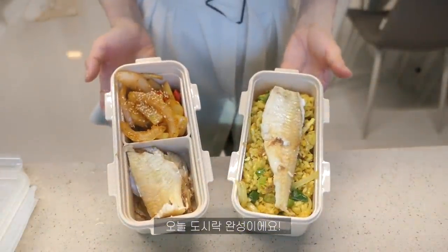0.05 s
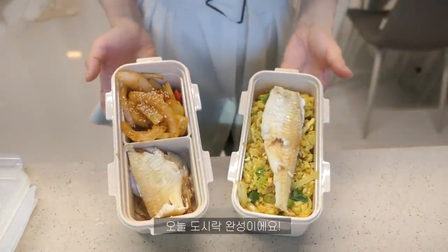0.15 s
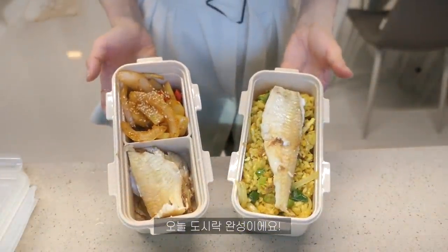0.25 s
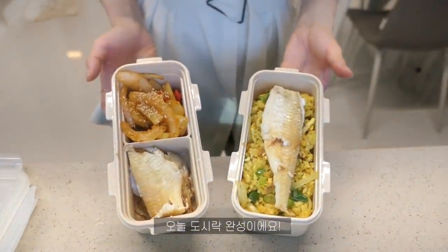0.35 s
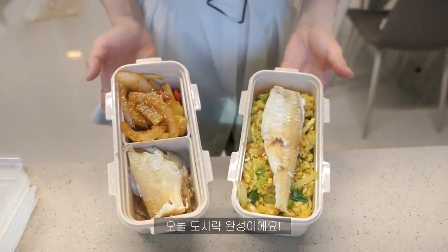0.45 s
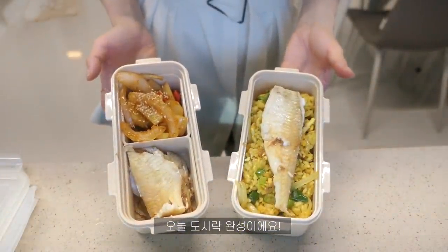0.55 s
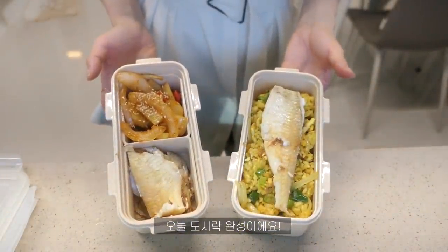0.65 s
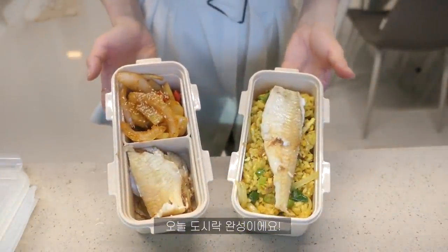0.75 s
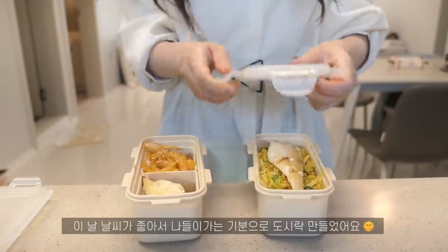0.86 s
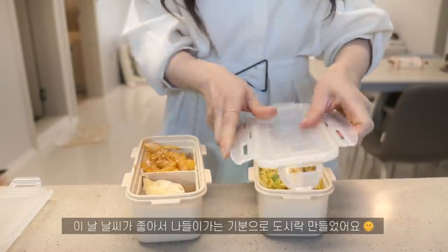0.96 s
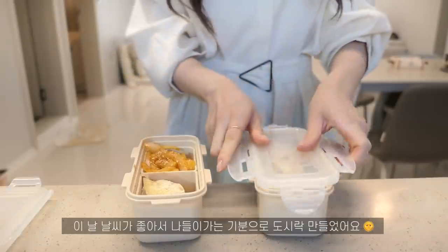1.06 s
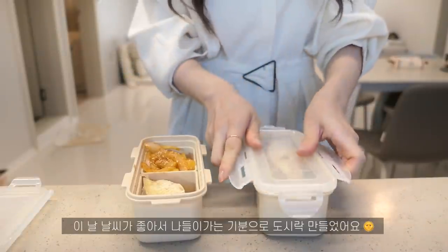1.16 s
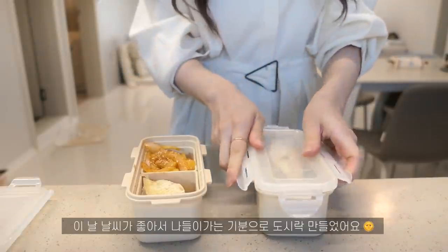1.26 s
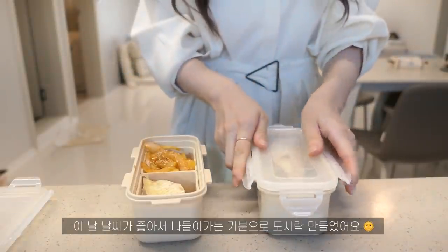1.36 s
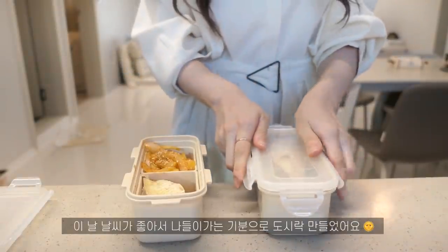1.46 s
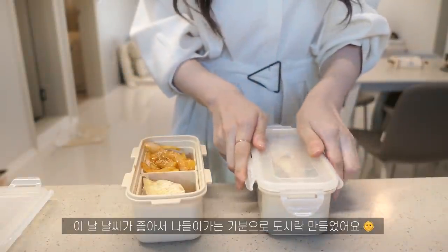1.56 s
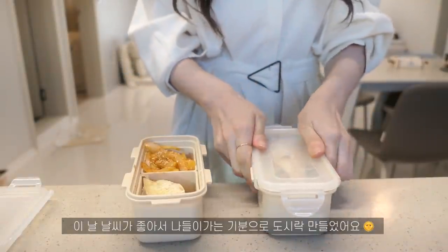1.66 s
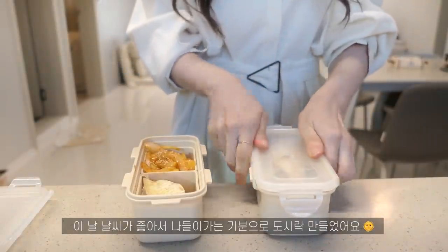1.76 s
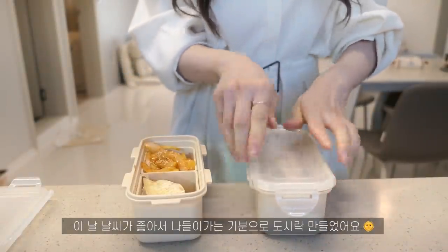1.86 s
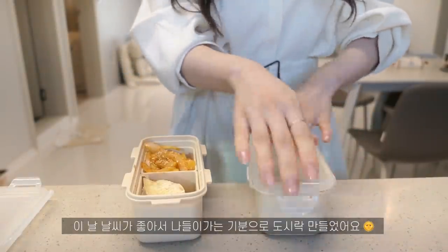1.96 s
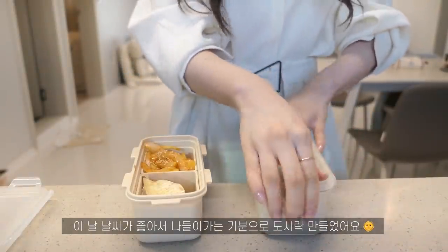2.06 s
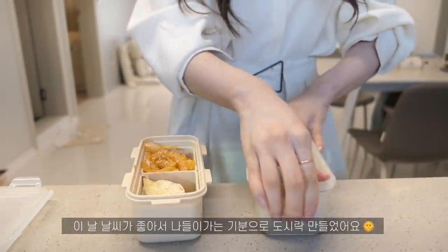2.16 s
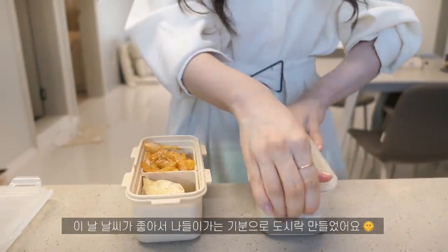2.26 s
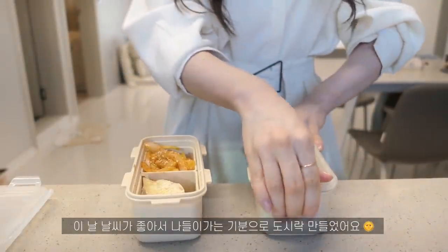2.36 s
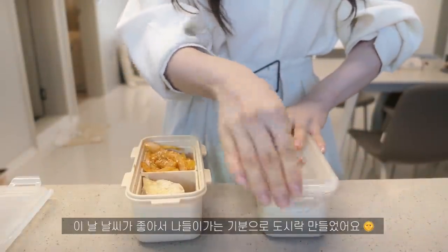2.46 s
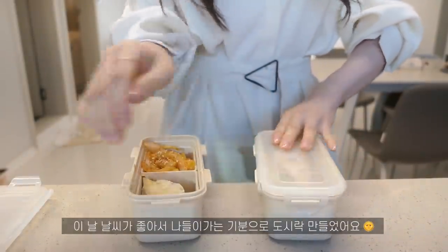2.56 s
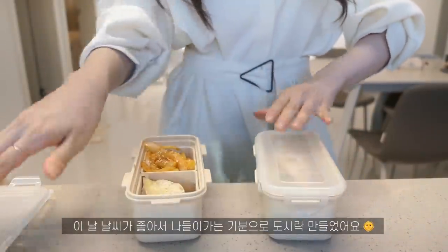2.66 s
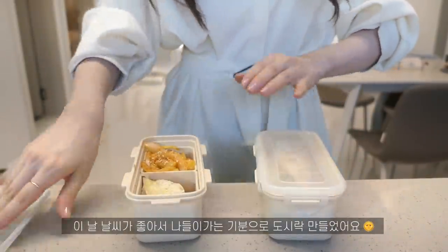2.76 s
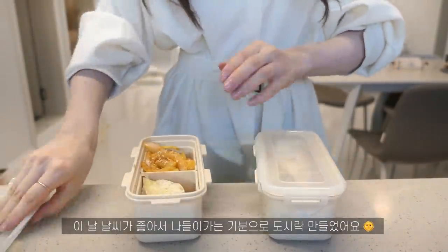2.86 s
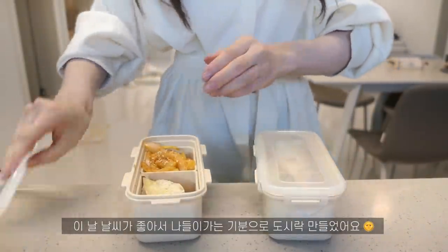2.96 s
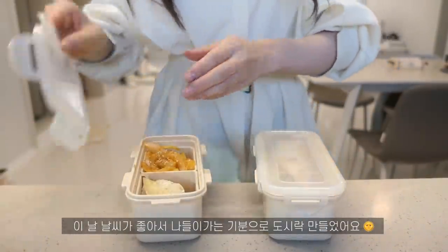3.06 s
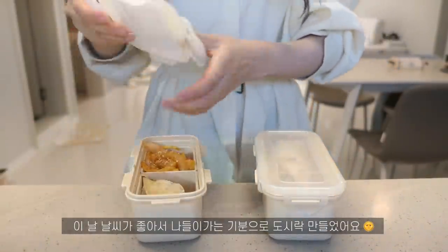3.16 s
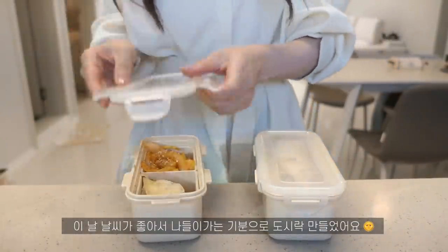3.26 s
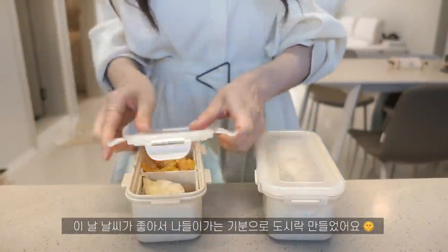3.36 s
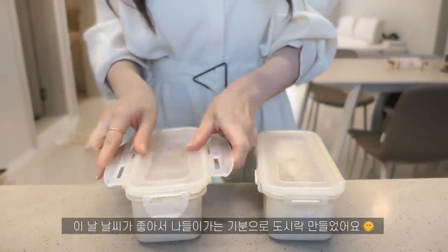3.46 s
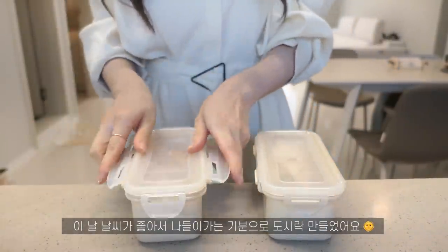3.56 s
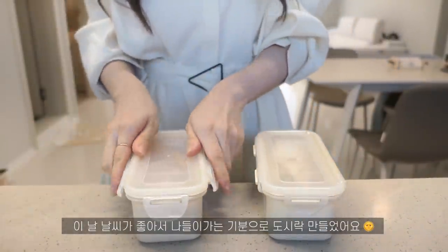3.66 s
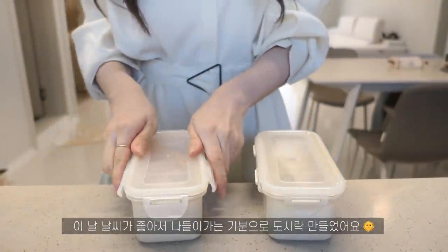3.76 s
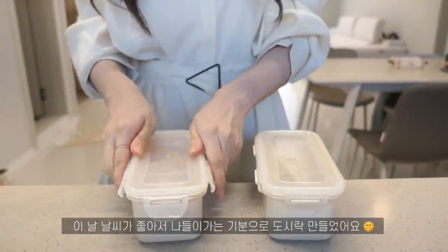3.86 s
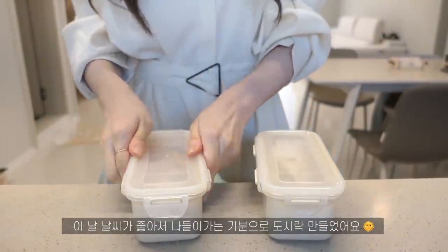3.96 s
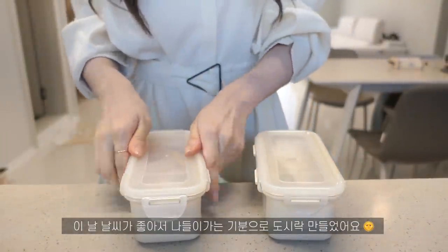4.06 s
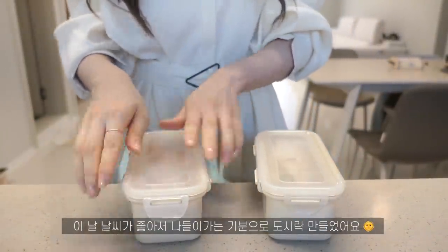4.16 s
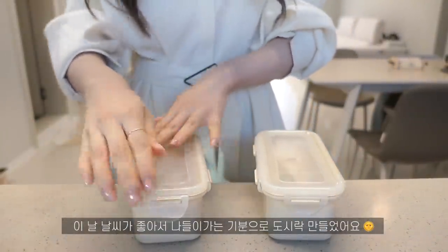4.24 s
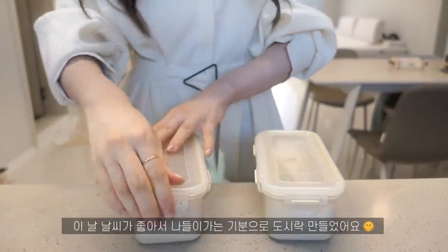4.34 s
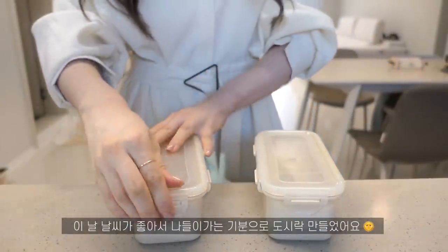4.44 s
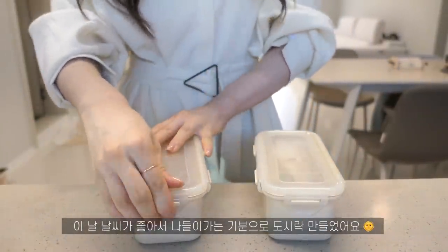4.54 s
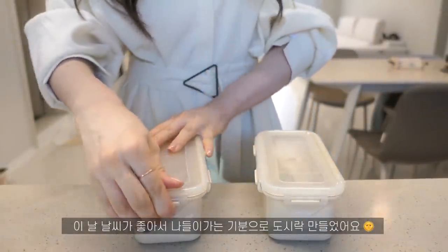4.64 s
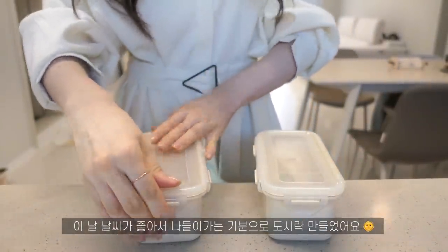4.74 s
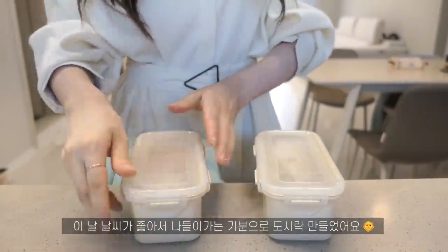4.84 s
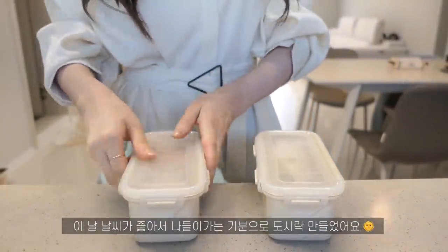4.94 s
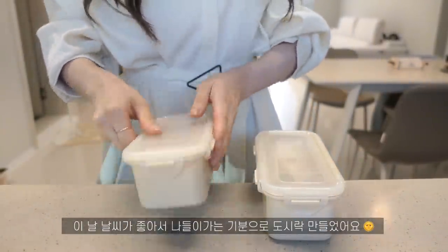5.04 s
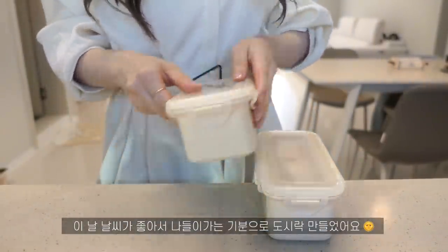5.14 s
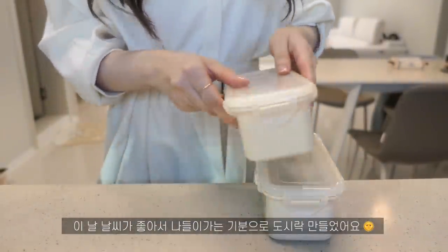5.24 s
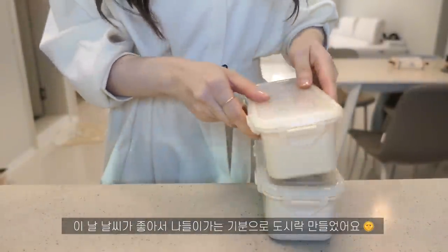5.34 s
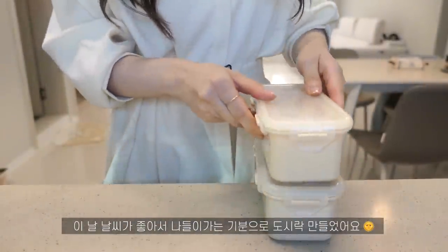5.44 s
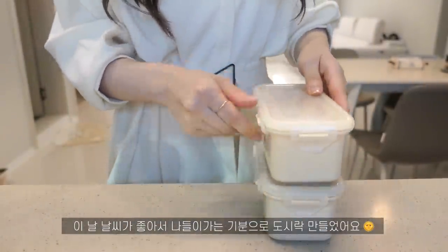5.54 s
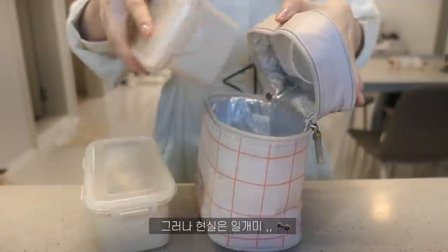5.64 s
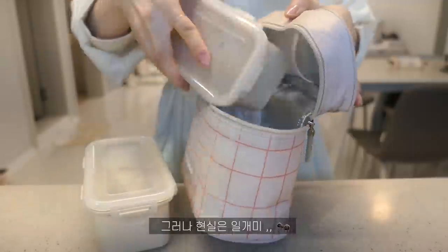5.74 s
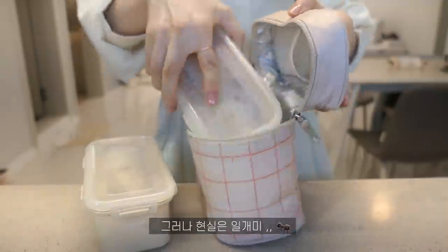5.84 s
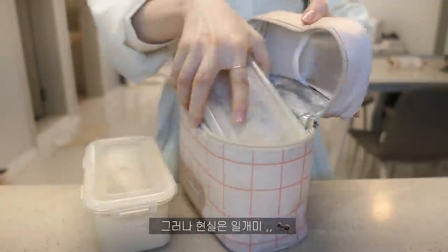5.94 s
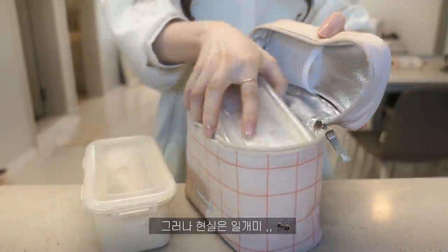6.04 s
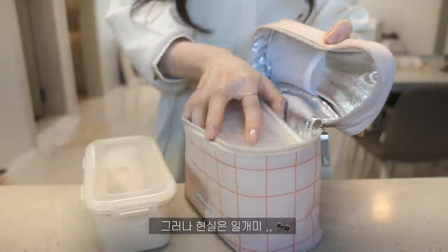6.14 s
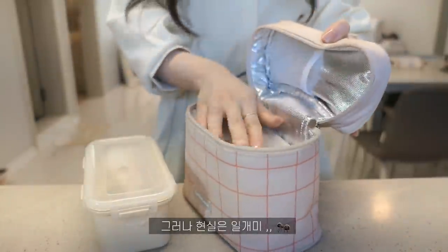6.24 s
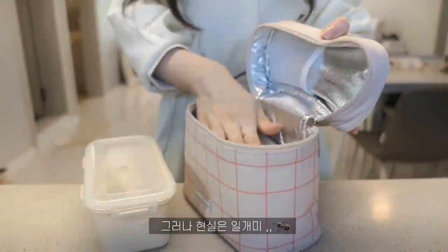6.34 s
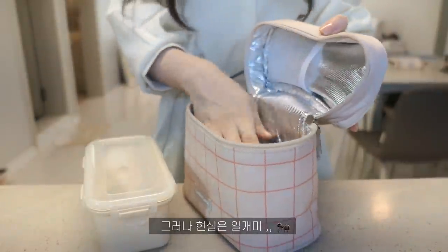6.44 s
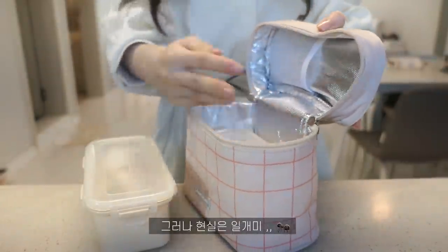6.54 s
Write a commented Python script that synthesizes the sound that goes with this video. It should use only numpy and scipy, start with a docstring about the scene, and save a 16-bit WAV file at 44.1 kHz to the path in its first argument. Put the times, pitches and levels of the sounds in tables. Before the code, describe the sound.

Faint, soft kitchen air opens alone, its tone shifting slightly at 0.8 s. From 1.1 to 1.4 s a light plastic lid clatters onto a full box in hollow, mid-pitched knocks with finger rubs. At 1.67 s a latch cracks shut, very loud and close, its bright echo swelling in the room; softer handling follows, then another sharp snap at 2.27 s with a small follow-up click. Around 2.9-3.0 s come light ticks, a rub and a tiny rising rubber squeak. The second lid knocks down at 3.4-3.75 s with a short hollow hum gliding downward, then snaps hard at 3.96 s and with a crisp double click at 4.54-4.6 s. Boxes shift at 4.97 s and stack with low thumps at 5.4-5.5 s. At 5.67 s the echo breaks off; until 6.6 s a box pushes into a soft foil-lined bag with rubs, crackling rustle and dull bumps.

```python
"""Two plastic lunch boxes on a stone counter in a quiet kitchen, whose air noise changes colour early on.
The first lid is laid on with knocks and snapped shut by its latches; a gasket squeaks. Air hums under the
second lid until it too is snapped shut. The boxes settle and are stacked, contact ringing and echo break off,
and one box is pushed into a foil-lined bag with rubs, rustles and bumps. Contacts are struck box modes plus
clicks and hiss; a limiter ducks on the loudest peaks and lets the room's echo swell back as it recovers."""
import sys
import numpy as np
from scipy import signal
from scipy.fft import rfft, irfft, next_fast_len
from scipy.io import wavfile
from scipy.ndimage import uniform_filter1d, minimum_filter1d, map_coordinates

SR = 44100
rng = np.random.default_rng(int(sys.argv[2]) if len(sys.argv) > 2 else 0)


def put_to_file(sound):
    """Save the sound as 16-bit audio at rate SR, in the file named by the first command-line argument."""
    columns = np.atleast_2d(sound).T  # one column per channel
    safe = np.clip(columns, -1, 1)
    whole_steps = np.round(safe * 32767)
    wavfile.write(sys.argv[1], SR, whole_steps.astype(np.int16))


N = 291060
CUT_S = 5.668  # contact ringing and echo break off here


def amp(db):
    """Decibels to amplitude."""
    return 10 ** (np.asarray(db) / 20)


def unit(x):
    """Scale to an RMS of 1."""
    return x / np.sqrt(np.mean(x ** 2) + 1e-20)


def along(points, hz):
    """Interpolate (f/Hz, value) points on a log-frequency axis."""
    f, v = np.transpose(points)
    return np.interp(np.log(hz + 1), np.log(f + 1), v)


def curves(rows, outside=None):
    """One value per sample for each column after the time."""
    s, *cols = np.transpose(rows)
    return np.array([np.interp(np.arange(N) / SR, s, c, outside, outside) for c in cols])


def wobble(rate_hz):
    """Smooth random curve through rate_hz knots a second."""
    knots = rng.standard_normal(int(N * rate_hz / SR) + 4)
    return map_coordinates(knots, [np.arange(N) * rate_hz / SR])


def filtered(x, response):
    """Multiply the spectrum of x by a response of frequency in Hz."""
    n = x.shape[-1]
    m = next_fast_len(n + 8192)
    return irfft(rfft(x, m) * response(np.fft.rfftfreq(m, 1 / SR)), m)[..., :n]


def paired(noises, alike, spectrum):
    """Two unrelated noises mixed into left and right of the given likeness and colour."""
    def mid_side(hz):
        angle = np.arccos(np.clip(along(alike, hz), -1, 1)) / 2
        return amp(along(spectrum, hz)) * [np.cos(angle), np.sin(angle)]

    mid, side = filtered(noises, mid_side)
    return unit(np.array([mid + side, mid - side]))


def grains(rate_hz, spread_db):
    """Tiny slips at random moments, few of them strong."""
    strength = amp(spread_db * np.minimum(rng.exponential(size=N), 3))
    return (rng.random(N) < rate_hz / SR) * rng.standard_normal(N) * strength


def patchy(x, depth_db):
    """Random patches of gain over time and frequency, alike in both rows."""
    z = signal.stft(x, nperseg=256)[2]
    field = rng.standard_normal(z.shape[1:])
    field = uniform_filter1d(uniform_filter1d(field, size=14, axis=0), size=9, axis=1)
    return signal.istft(z * amp(depth_db * unit(field)), nperseg=256)[1][:, :N]


# air colour at the first and second viewpoint: f/Hz, relative density/dB
AIR_FIRST = [(15, -50), (30, -15), (175, -8), (236, 0.5), (263, -9.5), (301, -8.5), (531, -8), (641, -12.5),
             (1100, -14), (1400, -15.5), (1520, -22), (4740, -37), (6380, -31), (14800, -35.5),
             (16000, -36)]
AIR_LATER = [(15, -36.5), (30, -7), (70, -15), (108, -5), (309, -2.5), (344, -4.5), (503, -7), (591, -2),
             (775, -10.5), (863, -9), (1440, -15), (2050, -20.5), (16000, -35.5)]
# air: f/Hz, left-right likeness (-1 to 1)
AIR_ALIKE = [(60, -0.97), (180, -0.63), (550, -0.59), (1650, -0.32), (4970, 0.61), (15000, 0.047)]
MOVE_S, FIRST_DB, LATER_DB = 0.824, -45, -43.5  # the viewpoint changes at MOVE_S


def hush():
    """Steady kitchen air: coloured noise, from one viewpoint and then another."""
    first = paired(rng.standard_normal((2, N)), AIR_ALIKE, AIR_FIRST)
    later = paired(rng.standard_normal((2, N)), AIR_ALIKE, AIR_LATER)
    air = np.where(np.arange(N) < MOVE_S * SR, amp(FIRST_DB) * first, amp(LATER_DB) * later)
    return amp(0.84 * wobble(21)) * air


# echo: f/Hz, t60/s, relative level/dB
ECHO = [(101, 0.51, 13), (308, 0.39, 5), (700, 0.67, 2.5), (1400, 0.71, 0), (2260, 0.74, 0),
        (3530, 0.61, 8), (5470, 0.6, 6), (7000, 0.62, 3.5), (9500, 0.54, 1.5), (12500, 0.44, 2),
        (15000, 0.36, 8)]
# echo: f/Hz, left-right likeness (-1 to 1)
ECHO_LIKENESS = [(60, 0.91), (180, 0.75), (550, 0.81), (1650, 0.75), (4970, 0.83), (15000, 0.49)]


def kitchen(x):
    """Each frequency of the echo dies at its own speed; a fresh random tail serves each third of a second."""
    out, step, rows = np.zeros((2, N + 3 * SR)), SR // 3, np.array(ECHO)
    for at in range(0, N, step):
        hz, t, z = signal.stft(rng.standard_normal((2, SR)), SR, nperseg=256)
        decay = amp(-60 * t / along(rows[:, :2], hz)[:, None])
        onset = np.clip(t / 0.0027, 0, 1)
        tail = signal.istft(z * decay * onset, SR, nperseg=256)[1]
        tail = paired(tail, ECHO_LIKENESS, rows[:, ::2]) / np.sqrt(tail.shape[1])
        wet = signal.fftconvolve(x[None, at:at + step], tail, axes=1)
        out[:, at:at + wet.shape[1]] += wet
    return out[:, :N]


# box pushed into the bag: t/s, press level/dB, rustle level/dB, low bump level/dB
BAG_PUSH = [(5.745, -61, -51, -62), (5.777, -39, -36.5, -68), (5.835, -45, -45, -40),
            (5.855, -46, -56, -44), (5.867, -33, -35, -27), (5.899, -38, -34, -38),
            (6.029, -36, -36.5, -59), (6.075, -34, -34.5, -63), (6.127, -34.5, -42.5, -42),
            (6.161, -34.5, -41.5, -57), (6.213, -35, -42.5, -47), (6.237, -26, -25, -40),
            (6.267, -18.5, -35, -34), (6.299, -36.5, -56, -47), (6.327, -28, -35, -52),
            (6.351, -20.5, -26, -45), (6.377, -35, -37.5, -21), (6.392, -40, -41, -28),
            (6.407, -38, -39, -33), (6.461, -34, -37, -56), (6.6, -67, -38.5, -70)]
BAG_RUB_DB = -0.5  # over the mean of press and rustle


def sag():
    """The soft bag gives under the box: lumpy noise through a 95 Hz resonance."""
    lumps = amp(8.1 * wobble(22)) * rng.standard_normal(N)
    bumps = filtered(lumps, lambda f: 1j * f * 60 / (95 ** 2 - f * f + 1j * f * 60))
    return amp(curves(BAG_PUSH, -120)[2]) * unit(bumps)


# hand movements: t/s, hold/s, press level/dB, rub level/dB, rustle level/dB
HAND_MOVES = [(0.847, 0.13, -52, -54.5, -53), (1.109, 0.11, -65, -35.5, -52), (1.306, 0.074, -42, -50, -51),
              (1.465, 0.18, -44.5, -45, -56), (2, 0.14, -48, -40.5, -60.5), (2.908, 0.1, -50, -45, -58),
              (3, 0.011, -40, -26.5, -33), (3.166, 0.5, -55.5, -50.5, -57), (3.438, 0.21, -40.5, -54, -58),
              (3.686, 0.029, -67, -33, -46), (3.77, 0.18, -45.5, -56, -58), (4.318, 0.096, -49, -48, -49),
              (4.978, 0.023, -42, -34, -48.5), (5.427, 0.096, -49, -40.5, -72),
              (5.761, 0.017, -48, -38.5, -46), (5.81, 0.017, -48, -40.5, -48)]
REACH_DB_PER_S, LET_GO_DB_PER_S = 601, 169


def effort():
    """Press, rub and rustle levels in dB: each movement swells, holds and dies away."""
    t = np.arange(N) / SR
    moves = []
    for s, hold_s, *levels_db in HAND_MOVES:
        swell_db = REACH_DB_PER_S * np.maximum(s - t, 0)
        die_db = LET_GO_DB_PER_S * np.maximum(t - s - hold_s, 0)
        moves.append(np.array(levels_db)[:, None] - swell_db - die_db)
    press_db, rustle_db, _ = curves(BAG_PUSH, -120)
    bag_rub_db = (press_db + rustle_db) / 2 + BAG_RUB_DB
    return np.max(moves + [np.array([press_db, bag_rub_db, rustle_db])], axis=0)


# box modes, before damping and scatter: f/Hz, level/dB, t60/s
BOX_MODES = [(114.8, 3.5, 0.11), (219, -1.5, 0.089), (241, 11, 0.11), (305, 0, 0.22), (319, 1.5, 0.074),
             (399.9, 17, 0.012), (553, -5, 0.1), (680, -10.5, 0.2), (757.7, 0, 0.13), (986.4, 5, 0.094),
             (1100, 1, 0.069), (1264, -1, 0.16), (1620, -1.5, 0.0017), (1537, 5, 0.044), (1903, -18, 0.017),
             (2175, 10.5, 0.028), (2200, 23, 0.044), (4300, 15, 0.02), (5030, 5, 0.045),
             (6560, 10.5, 0.025), (7300, -10.5, 0.0037)]
# thud, body, edge and crack bands: low f/Hz, high f/Hz
PART_BANDS = [(95, 400), (400, 1600), (1600, 2700), (3700, 12000)]
# sleeve and foil rustle: f/Hz, relative density/dB
RUSTLE_COLOUR = [(880, -27), (1500, -27), (1960, -6), (3450, -13), (7390, -13), (12700, -22.5),
                 (15000, -21.5), (16000, -42)]


def gripped(modes, grip, f):
    """Response at f of resonances broadened by the hand's grip."""
    total = 0
    for k, (hz, db, t60_s) in enumerate(modes):
        loss = 1j * f * grip / t60_s
        total = total + (-1) ** k * amp(db) * loss / (hz * hz - f * f + loss)
    return total


def hands():
    """Fingers press and slide: slips drive the box modes, damped by the grip; sleeves and foil crackle."""
    press_db, rub_db, rustle_db = effort()
    low, middle = ([m for m in BOX_MODES if lo < m[0] < hi] for lo, hi in PART_BANDS[:2])
    pressing = amp(2.5 * wobble(30)) * rng.standard_normal(N)
    press = unit(filtered(pressing, lambda f: gripped(low, 6.5, f) / (1 + (f / 450) ** 4)))
    slips = amp(2.2 * wobble(40)) * grains(3500, spread_db=2)
    rub = unit(filtered(slips, lambda f: gripped(middle, 11, f) / (1 + (f / 1700) ** 2)))
    clumps = amp(2.2 * wobble(25) + 1.5 * wobble(90))  # creases give way in bursts
    crackle = np.array([unit(grains(3000, spread_db=4)) + 1.2 * rng.standard_normal(N) for _ in range(2)])
    rustle = paired(patchy(clumps * crackle, depth_db=3.5), [(2000, 0.73), (12000, 0.83)], RUSTLE_COLOUR)
    return amp(press_db) * press + amp(rub_db) * rub + amp(rustle_db) * rustle


# boxes settling on the counter or each other: t/s, level/dB before the envelope, f/Hz
LANDINGS = [(2.868, -45, 110), (4.96, -40, 150), (5.43, -24.5, 170), (5.51, -32, 149)]
SETTLE_RISE_S, SETTLE_T60_S = .008, 0.31


def settle():
    """A full box lands with a low, uneven thump that lingers: decaying resonant noise."""
    out = np.zeros(N)
    for s, db, hz in LANDINGS:
        def thump(f):
            resonance = 1j * f * hz / (hz * hz - f * f + 1j * f * hz * 0.5)
            return resonance / (1 + (f / hz / 2) ** 4)

        t = np.maximum(np.arange(N) / SR - s, 0)
        low = unit(filtered(rng.standard_normal(N), thump))
        out += amp(db - 60 * t / SETTLE_T60_S) * (1 - np.exp(-t / SETTLE_RISE_S)) * low
    return out


# air under the loose second lid: t/s, level/dB before a 4 dB cut, f/Hz
LID_AIR = [(3.536, -47, 760), (3.546, -24, 763), (3.57, -35, 753.4), (3.6, -34, 748.5), (3.644, -49, 721.2),
           (3.706, -11, 670), (3.782, -41.5, 642.5), (3.81, -19, 660), (3.836, -45, 693), (3.934, -30, 621),
           (3.95, -62, 648)]


def hollow():
    """Trapped air hums unevenly, gliding in pitch, while the lid is worked into place."""
    level_db, pitch_hz = curves(LID_AIR)
    n = np.arange(N)
    inside = (n > LID_AIR[0][0] * SR) & (n < LID_AIR[-1][0] * SR)
    phase = 2 * np.pi * np.cumsum(pitch_hz) / SR
    hum = wobble(170) * np.cos(phase) + wobble(170) * np.sin(phase)
    return inside * amp(level_db - 4) * unit(hum)


SQUEAK_S, SQUEAK_LENGTH_S = 2.979, 0.014
SQUEAK_HZ, SQUEAK_RISE_HZ, SQUEAK_DB = 1230, 246, -13


def squeak():
    """The rubber gasket slips once: a slightly rising chirp with two weak harmonics."""
    u = np.clip((np.arange(N) / SR - SQUEAK_S) / SQUEAK_LENGTH_S, 0, 1)
    phase = 2 * np.pi * np.cumsum(SQUEAK_HZ + SQUEAK_RISE_HZ * u) / SR
    tone = np.sin(phase) + amp(-24) * np.sin(2 * phase) + amp(-28) * np.sin(3 * phase)
    return amp(SQUEAK_DB + 1.5 * wobble(560)) * np.sin(np.pi * u ** 1.24) * tone


# thud hiss band: low f/Hz, high f/Hz
THUD_HISS_BAND = (215, 430)
# left-right differing share of hiss: thud, body, edge, crack (ratio)
HISS_WIDTH = [.05, .1, .15, .35]


def contacts(table, rise_s, blow_t60_s, damping, hiss, hiss_t60_s, click, count, span, focus_db, carry):
    """Each contact shakes the box modes at new strengths, clicks and hisses in each part.

    Returns the near sound and what fills the room: there only the first count parts keep their ring,
    the others mostly even out over all directions and carry a share of it.
    """
    near, far, t = np.zeros((2, N + SR)), np.zeros(N + SR), np.arange(SR // 8) / SR
    hz, level_db, t60_s = np.transpose(BOX_MODES)[..., None]
    part = np.searchsorted([lo for lo, hi in PART_BANDS], hz[:, 0]) - 1
    spike = 1. * (np.arange(len(t)) == round(rise_s * SR))

    def bandpass(edges_hz):
        return signal.butter(2, edges_hz, "band", fs=SR, output="sos")

    def fade(fade_t60_s):
        return (1 - np.exp(-t / rise_s)) * amp(-60 * t / fade_t60_s)

    bands = [bandpass(edges) for edges in PART_BANDS]
    for s, db, thud_db, edge_db, crack_db, pan_db, pitch_hz in table:
        # the struck spot favours body modes near its pitch
        spot_db = -focus_db * np.log2(hz / pitch_hz) ** 2 * (part == 1)[:, None]
        noisy = [bandpass(THUD_HISS_BAND), bandpass((pitch_hz / span, pitch_hz * span))] + bands[2:]
        # signs join neighbours smoothly
        clicks = [(-1) ** k * unit(signal.sosfilt(band, spike)) for k, band in enumerate(noisy)]
        luck = rng.standard_normal((len(BOX_MODES), 2, 1))
        decay = amp(level_db + spot_db + 2 * luck[:, 0] - 60 * t * damping / t60_s)
        rings = decay * np.sin(2 * np.pi * hz * (1 + .06 * luck[:, 1]) * t)
        blow = ((0.5 + rng.standard_normal(len(t))) * fade(blow_t60_s))[:SR // 50]
        hit, even = np.zeros((2, len(t))), np.zeros(len(t))
        for k, gain_db in enumerate([thud_db, 0, edge_db, crack_db]):
            struck = signal.fftconvolve(rings[part == k].sum(0), blow)[:len(t)]
            ring = signal.sosfilt(bands[k], struck)
            noise, apart = signal.sosfilt(noisy[k], rng.standard_normal((2, len(t))) * fade(hiss_t60_s[k]))
            sound = unit(ring) + hiss[k] * unit(noise) + click[k] * clicks[k]
            size = amp(gain_db) / np.abs(sound).max()
            sound = size * sound
            hit += sound + size * HISS_WIDTH[k] * hiss[k] * unit(apart) * [[1], [-1]]
            even += sound if k < count else clicks[k] * np.std(sound) + carry * sound
        at = round(s * SR)
        length = len(t) if s > CUT_S else min(len(t), round(CUT_S * SR) - at)
        near[:, at:at + length] += amp(db + np.array([[pan_db], [-pan_db]]) / 2) * hit[:, :length]
        far[at:at + length] += amp(db) * even[:length]
    return near[:, :N], far[:N]


# lid and box knocks: t/s, body level/dB, thud, edge and crack level over body/dB, body f/Hz
KNOCK_HITS = [(0.833, -42.5, 9.5, -12, -17, 489), (1.106, 3, -26, -11.5, -24, 1015),
              (1.139, -4, -13.5, -10.5, -18, 815), (1.149, -5.5, -10.5, -16, -20, 930),
              (1.155, -3, -24, -7.5, -22, 1030), (1.167, -19, -9, -26, -35, 1100),
              (1.184, -9, -22, -27, -28, 1160), (1.193, -15.5, -28, -26, -35, 940),
              (1.206, -18, -10, -2, -5.5, 786), (1.274, -9, -25, -6, -7, 1260),
              (1.332, -9, -16, -30, -45, 720), (1.358, -10, -3.5, -17, -14, 980),
              (1.368, -1.5, -15, -27, -29, 795), (1.372, -1.5, -28, -11.5, -9.5, 1100),
              (1.382, -2.5, -3.5, -32, -18, 680), (1.387, -8, -9.5, -28, -35, 544),
              (1.404, -30.5, 4, -35, -46, 497), (1.53, -20.5, -31, -5, -8, 630),
              (2.04, -40.5, 17, -15, -17, 727), (2.868, -35, 0, -10, -5, 982),
              (2.905, -35, -4.5, 1, 3.5, 799), (3.005, -12.5, -11.5, -0.5, -1, 1100),
              (3.015, -20.5, -8, -6, -15, 900), (3.018, -14, -8.5, 2.5, 5, 1200),
              (3.222, -42, 15.5, -17, -18, 503), (3.389, -27.5, -32, -7, -5, 1060),
              (3.439, -3, -40, -11, -14.5, 960), (3.486, -23.5, -11, -5.5, -7, 746),
              (3.5357, 4, -31, -12, -22, 785), (3.545, -13, -5.5, 0, -3, 900),
              (3.59, -11.5, -14.5, -46, -60, 727), (3.66, -13.5, -24, -3, -12, 650),
              (3.684, -10, -15, -38, -50, 680), (3.691, -2.5, -10, -22, -28, 1100),
              (3.694, -20, -16, -33, -43, 950), (3.699, -5, -22, -35, -43, 880),
              (3.705, -2.5, -4, -12, -12.5, 570), (3.719, -27, 0, -27, -36, 680),
              (3.738, -14.5, 1, -32, -42, 570), (3.759, -24, -6, -19, -30, 680),
              (4.313, -32.5, 5.5, -21, -36.5, 1030), (4.385, -10.5, -18.5, -9, -5, 790),
              (4.949, -32.5, 0, -15, -20, 519), (4.976, -9.5, -13, -15, -12, 1030),
              (5.413, -19, -3.5, -1.5, -2.5, 930), (5.429, -7.5, -8, -6.5, -7.5, 588),
              (5.508, -21.5, 2, -3, -1, 640), (5.657, -22.5, -1, -39, -50, 574),
              (5.755, -32, -8, 3, 2, 684), (5.78, -20.5, -37, -0.5, -12, 700),
              (5.81, -23.5, -8, -1.5, 3, 700), (5.866, -5.5, -19, -15, -18, 644),
              (5.884, -13.5, -8, -18, -18, 700), (5.896, -23, -10, -25, -35, 590),
              (5.928, -16, -10, -14, -7, 584), (6.071, -14.5, -8.5, -11, -20, 520),
              (6.201, -26, -6, -5, -20, 700), (6.232, -7.5, -8.5, -7, -19, 680),
              (6.256, -5, -29, -8, -11, 960), (6.296, -16.5, -5, -18, -30, 800),
              (6.326, -17.5, -3.5, -9, -20, 600), (6.354, -11.5, -4, -6, -11, 593),
              (6.36, -17.5, 3, -16, -30, 550), (6.383, -25, 2, -25, -35, 450),
              (6.397, -20, -20, -6, -8, 700), (6.408, -24, -20, -15, -17, 750),
              (6.444, -19, -11, -2, 0, 605), (6.463, -20, -4, -13, -25, 900),
              (6.582, -18, -19, -23, -35, 755)]
# where the hands work: t/s, left over right/dB before scatter
HAND_PLACE = [(0.8, 1), (2.2, -3.5), (3.0, 3.5), (4.9, 3), (5.4, -2.5), (5.9, 1.7), (6.6, 2.5)]
PLACE_SCATTER_DB = 1.2


def knocks():
    """Lids and boxes touch where the hands are: short blows on the modes, body tightly tuned."""
    rows = []
    for *row, hz in KNOCK_HITS:
        pan_db = np.interp(row[0], *np.transpose(HAND_PLACE)) + PLACE_SCATTER_DB * rng.standard_normal()
        rows.append((*row, pan_db, hz))
    return contacts(rows, rise_s=0.0007865, blow_t60_s=0.0017, damping=1.33,
                    hiss=[1.45, 0.65, 0.91, 0.54], hiss_t60_s=[0.12, 0.017, 0.071, 0.11],
                    click=[0.73, 0.27, 1.06, 0.58], count=1, span=1.484, focus_db=37.5, carry=.3)


# latch snaps: t/s, body level/dB, thud, edge and crack level over body/dB, body f/Hz
LATCH_SNAPS = [(1.6665, 20, -15.5, 1.5, 6.3, 754), (1.678, 10.5, -20, 3, 5.5, 1320),
               (2.068, -9, -13, 0, 8.8, 890), (2.2739, 14, -20.5, 3.5, 12.7, 1150),
               (2.317, 3, -8.5, 3.5, 12.5, 1100), (3.9583, 19, -12.5, 2, 7.1, 810),
               (3.979, 12, -35, -7, 8.9, 810), (4.5417, 7, -11, 3.5, 11.3, 1030),
               (4.6044, 9, -31, 2, 13, 920)]


def snaps():
    """Latches snap shut in the middle: longer blows on the modes with strong edge and crack clicks."""
    rows = [(*row, 0, hz) for *row, hz in LATCH_SNAPS]
    return contacts(rows, rise_s=0.00067, blow_t60_s=0.0044, damping=1.98,
                    hiss=[.6, .7, .9, 1.7], hiss_t60_s=[0.13, 0.015, 0.09, 0.047],
                    click=[0.34, 0.24, 1.53, 1.83], count=0, span=1.626, focus_db=10, carry=0.26)


def scene():
    """Sum near sounds, their echo on each side of the cut, and the air."""
    snaps_near, snaps_far = snaps()
    knocks_near, knocks_far = knocks()
    rubbing = hands() + sag() + hollow() + settle()
    slip = squeak()
    far = amp(-12.0) * snaps_far + amp(-9.0) * knocks_far + amp(-6.5) * rubbing.mean(0) + amp(-16) * slip
    before = np.arange(N) < CUT_S * SR
    echo = before * kitchen(far * before) + kitchen(far * ~before)
    near = snaps_near + knocks_near + rubbing + slip * amp([[1.6], [-1.6]])
    return near + echo + hush()


# microphone's uneven treble, with a dip near 13 kHz: f/Hz, gain/dB
MIC_TREBLE = [(11000, -5.5), (13000, -14.5), (15000, -6), (16000, -20)]
TOP_HZ = 16600


def record(dry):
    """Microphone colours the treble and thins the bass; look-ahead limiter; clipped peaks; band limit."""
    dry = filtered(dry, lambda hz: amp(along(MIC_TREBLE, hz)))
    dry = signal.sosfilt(signal.butter(2, 60, "high", fs=SR, output="sos"), dry)
    t, ahead, recover_db_per_s = np.arange(N) / SR, SR // 250, 70
    # threshold +5 dB: the sharpest peaks are left to clip
    over_db = np.maximum(20 * np.log10(np.abs(dry).max(0) + 1e-9) - 5, 0)
    over_db = -minimum_filter1d(-over_db, ahead)
    held_db = np.maximum.accumulate(over_db + recover_db_per_s * t) - recover_db_per_s * t
    limited = dry * amp(-uniform_filter1d(held_db, ahead // 2))
    clipped = limited / (1 + np.abs(limited) ** 6) ** (1 / 6)
    return filtered(.93 * clipped, lambda hz: (hz < TOP_HZ) * hz ** 4 / (hz ** 4 + 38 ** 4))


dry = scene()
out = record(dry)
put_to_file(out)
```